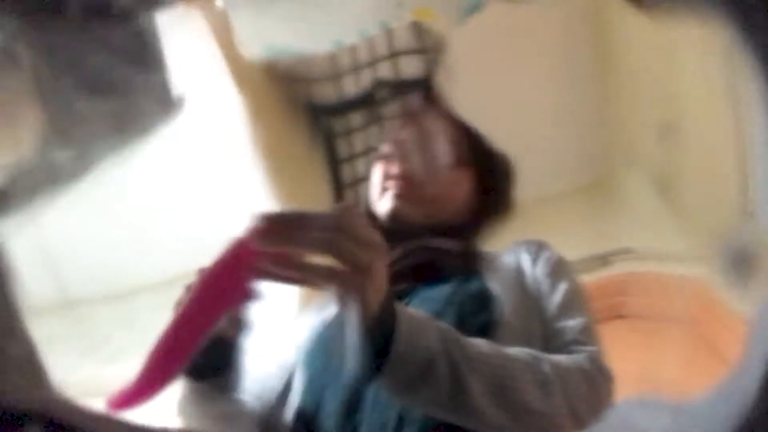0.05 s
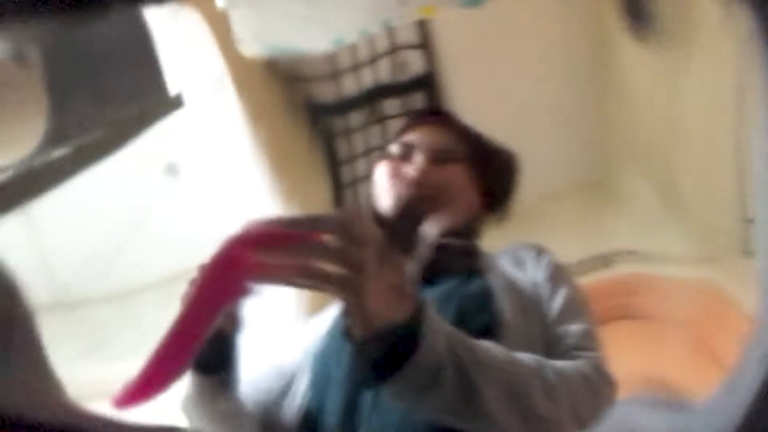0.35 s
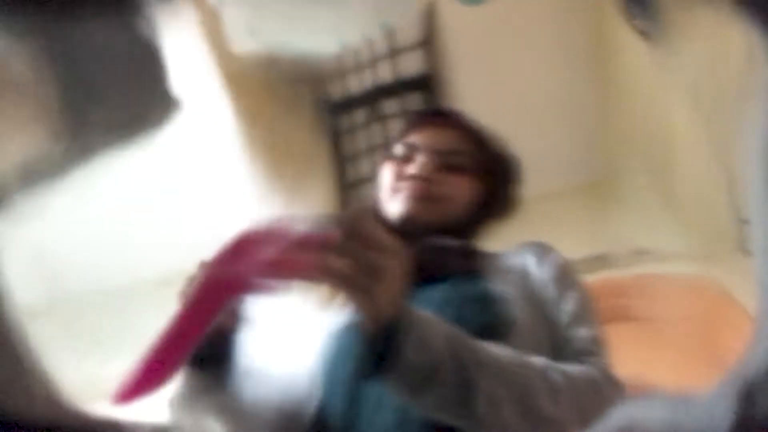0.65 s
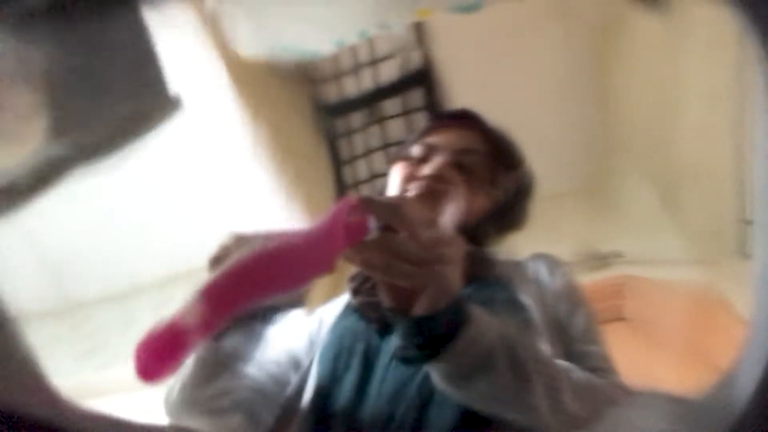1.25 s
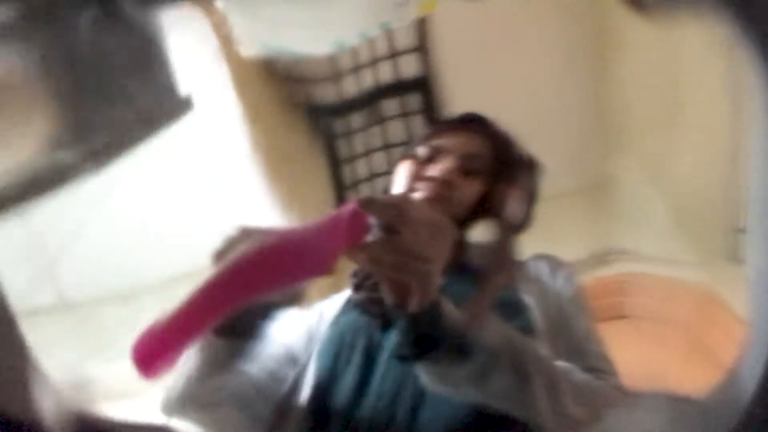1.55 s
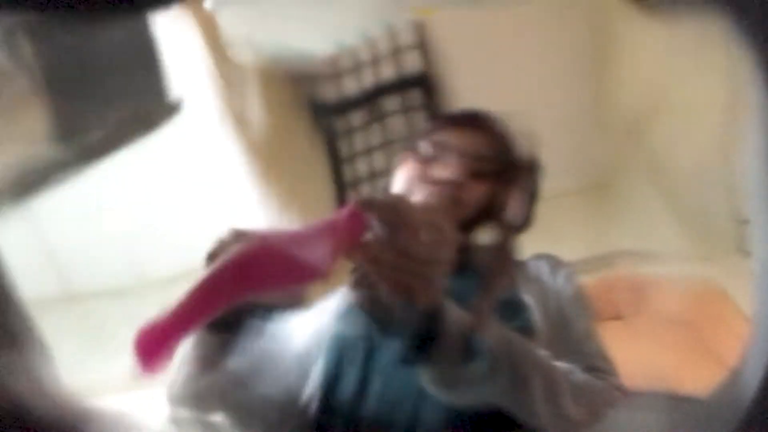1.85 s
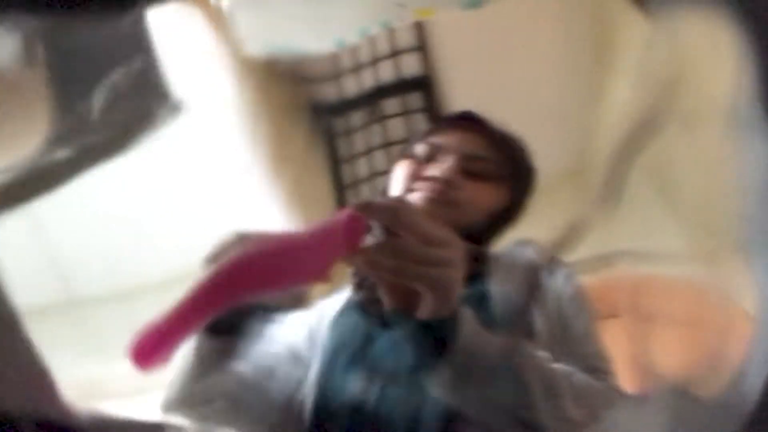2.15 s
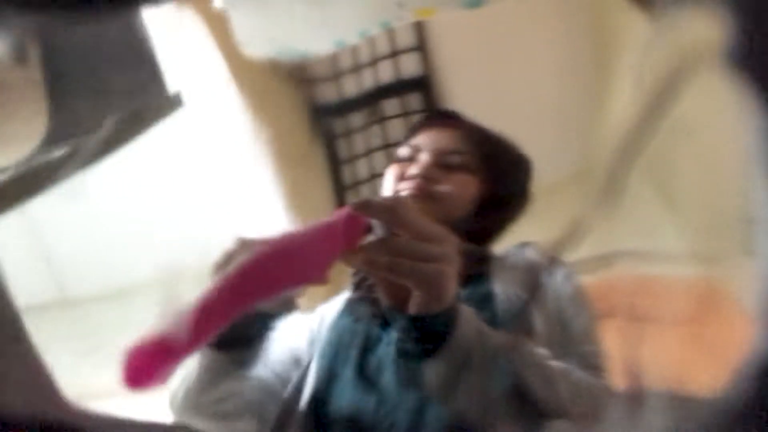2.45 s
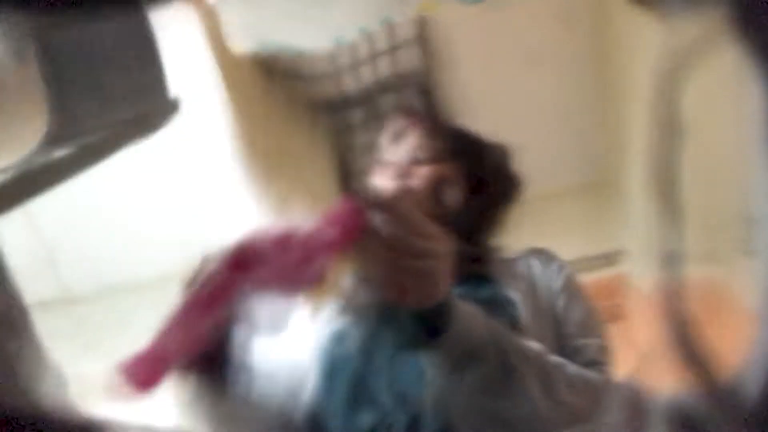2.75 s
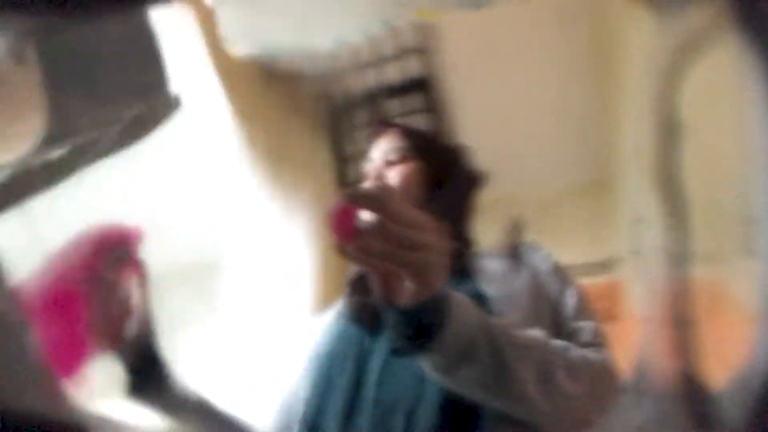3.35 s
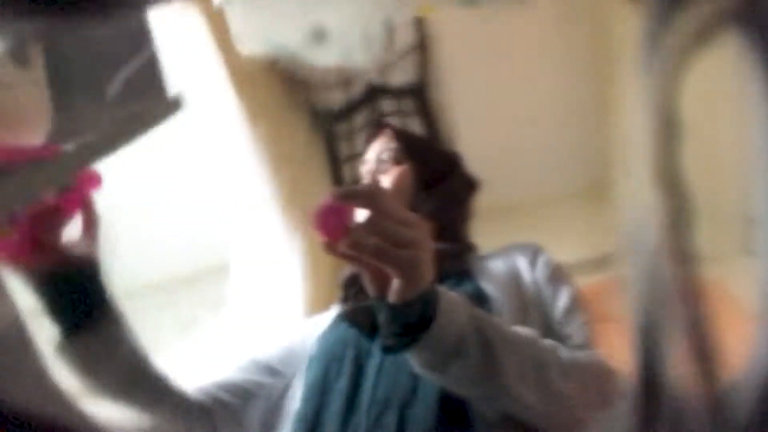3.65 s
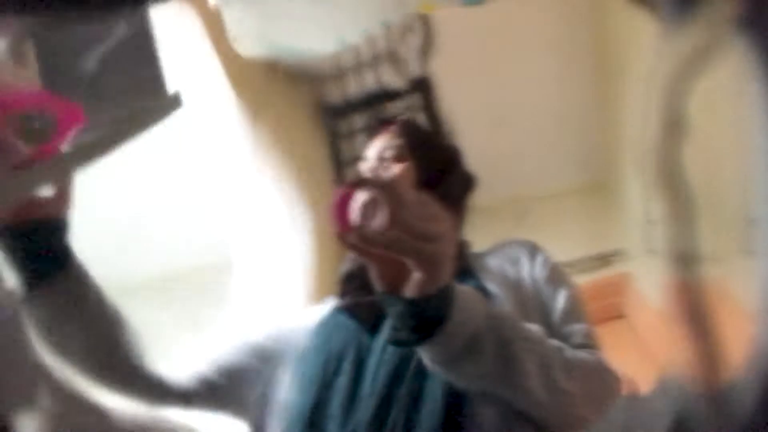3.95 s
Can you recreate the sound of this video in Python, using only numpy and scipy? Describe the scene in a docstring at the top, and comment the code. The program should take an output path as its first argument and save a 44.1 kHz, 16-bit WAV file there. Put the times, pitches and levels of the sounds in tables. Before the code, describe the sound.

Running water drums hollowly on the wall of a washing machine drum, heard from inside, with drops hitting the microphone. Underneath are a low churning rumble, a few dull gulps of air and a faint hum.

```python
"""Water pours into a washing machine drum and spatters on and around a microphone lying inside it.
A surging stream of drops and tiny bubbles, with single louder splashes, rings the microphone's wet
housing, while the jet drumming on the wall keeps its low notes ringing. Below it the tub rumbles under
the churning water, the machine hums faintly, and heavy gulps of air knock on the tub."""
import sys
import numpy as np
from scipy import signal
from scipy.fft import rfft, irfft
from scipy.io import wavfile
from scipy.ndimage import uniform_filter1d

SR = 44100
rng = np.random.default_rng(int(sys.argv[2]) if len(sys.argv) > 2 else 0)


def generate_wav(sig):
    """Save sig (samples, or channels by samples) to the path in sys.argv[1] as 16-bit PCM at SR."""
    pcm = np.round(np.clip(np.atleast_2d(sig).T, -1, 1) * 32767).astype(np.int16)
    wavfile.write(sys.argv[1], SR, pcm)


N = 176400  # 4 seconds

# How strongly the stream runs. Each row: time in seconds, strength in dB.
STREAM_STRENGTH = [(0, 5.5), (.1, 0), (.17, 7), (.33, 1.5), (.45, 0), (.57, 1), (.63, -12), (.67, 2.5),
                   (.74, 2), (.81, -8), (.94, -10.5), (.98, -4), (1.15, -5.5), (1.28, -2), (1.34, 5),
                   (1.48, 1.5), (1.65, 3.5), (2.08, 0), (2.14, 5), (2.27, 6), (2.355, -6.5), (2.45, 2),
                   (2.62, -6), (2.74, 3), (3.02, -1), (3.18, -8.5), (3.28, 0.5), (3.48, -3), (3.6, -4),
                   (4, -4)]
# The tone of a drop's hit before the housing colours it. Each row: frequency in Hz, level in dB.
DROP_TONE = [(500, -5), (1200, -7.5), (2500, -1), (5000, -6), (15000, -3.5)]
# The overall tone of the microphone's housing. Each row: frequency in Hz, level in dB.
HOUSING_TONE = [(100, 21.5), (400, 5.5), (700, 6.5), (1050, 7.5), (1500, 1.5), (2000, -3), (2500, -2),
                (3000, -17), (3800, -6.5), (4500, 1), (5250, -6), (6200, 2), (8300, -8.5), (9200, -2.5),
                (10800, -9), (12500, -12.5), (15500, -1.5)]
# The notes at which the housing rings. Each row: frequency in Hz, boost in dB.
HOUSING_NOTES = [(1184, 16), (1255, 11.5), (1744, 17), (2314, 18), (2637, 16.5), (3057, 19), (3402, 19.5),
                 (3552, 11), (3671, 10), (4252, 12.5), (5049, 13), (5555, 15.5), (6115, 8), (7041, 11),
                 (7439, 12), (8720, 13), (11670, 13), (12403, 18), (13490, 18), (15363, 1)]
# The tone of the jet before the housing colours it. Each row: frequency in Hz, level in dB.
JET_TONE = [(400, -2), (1200, 0), (2300, -1), (4000, -24)]
# How hard the jet drums on the wall. Each row: time in seconds, strength in dB.
JET_STRENGTH = [(0, 5), (.45, 0), (.72, 2.5), (.82, -5), (1.02, -1.5), (2.32, 2.5), (2.37, -1.5), (3, -1.5),
                (3.17, -11.5), (3.32, 1), (3.42, -6), (4, -5.5)]
# The tone of the tub's rumble. Each row: frequency in Hz, level in dB.
TUB_TONE = [(15, -37), (30, -25), (41, -9), (52, 0), (64, -5.5), (85, -1.5), (105, -6.5), (130, -7),
            (160, -16.5), (195, -26), (240, -19), (280, -13), (330, -28), (420, -29), (500, -49),
            (1000, -73.5)]
# How strongly the tub rumbles. Each row: time in seconds, strength in dB.
RUMBLE_STRENGTH = [(0, 1.5), (.75, 0), (1.15, -1), (1.4, 2), (1.9, -0.5), (2.8, -1.5), (3, 0.5), (3.2, -2),
                   (3.5, 0.5), (3.8, -2.5), (4, 4)]
# Splashes close by. Each row: start in seconds, peak level in dB, bubble pitch in Hz,
# level of the spray compared with the bubble in dB.
CLOSE_SPLASHES = [(0.0218, -20.5, 6800, 4.5), (0.2316, -24.5, 4370, -5), (0.2971, -22, 3520, -11.5),
                  (0.39, -25.5, 2680, -1), (0.5239, -19, 2690, 4), (0.6438, -21.5, 2320, 25.5),
                  (.6784, -22.5, 5400, 3.5), (0.715, -19, 4170, -2), (0.758, -26.5, 4400, -3),
                  (.952, -20.5, 3630, 3.5), (1.0865, -26, 5900, 9), (1.1751, -26, 2430, 18),
                  (1.3209, -15.5, 3840, -1.5), (1.4152, -22.5, 5200, 7), (1.5699, -21, 3470, -1.5),
                  (1.9798, -20, 4120, 2), (2.045, -25, 5800, -4), (2.257, -23.5, 6370, -7),
                  (2.371, -25.5, 4140, -24), (2.5556, -26.5, 6060, -3), (3.013, -19, 6120, 14),
                  (3.2154, -24, 2700, -24), (3.2954, -27, 6450, -14), (3.3867, -22, 2780, -26),
                  (3.56, -22.5, 4270, 3), (3.63, -27, 3480, 5)]
# Gulps that knock on the tub. Each row: start in seconds, peak level in dB, pitch in Hz.
AIR_GULPS = [(.754, -19, 235), (.812, -20, 240), (.876, -20, 240), (1.438, -19, 240), (1.584, -17, 62),
             (1.994, -23, 260), (2.262, -15, 75), (2.297, -16, 52), (2.329, -23, 240), (3.68, -21, 240),
             (3.865, -24, 260)]

HISS_LOW_HZ = 2830  # hiss and spray fade away below this


def undb(db):
    """Turn decibels into a number to multiply a sound by."""
    return 10 ** (np.asarray(db) / 20)


def level(x, db):
    """Scale a sound to an average (rms) level in dB."""
    return x * undb(db) / np.sqrt(np.mean(x ** 2))


def curve(points):
    """Join (seconds, value) points with straight lines."""
    return np.interp(np.arange(N) / SR, *np.array(points).T)


def wander(turns_per_s):
    """A value that drifts smoothly at random, mostly between -1 and 1."""
    step = max(int(SR / turns_per_s), 2)
    stairs = np.repeat(rng.standard_normal(N // step + 1), step)
    return 0.67 * uniform_filter1d(stairs, step)[:N]


def tap_sound(tone, notes=(), size=8192):
    """How an object with this tone and these ringing notes answers one sharp tap."""
    hz = np.arange(size // 2 + 1) * SR / size
    tone_hz, tone_db = np.array(tone).T
    db = np.interp(np.log(hz + 1), np.log(tone_hz), tone_db)
    for note_hz, boost_db in notes:
        half_width_hz = 35.8 + 0.0031 * note_hz
        db = db + boost_db / (1 + ((hz - note_hz) / half_width_hz) ** 2)
    # keep the tone, but make all the ringing come after the tap
    cepstrum = irfft(np.log(undb(db)))
    cepstrum[1:size // 2] *= 2
    cepstrum[size // 2 + 1:] = 0
    return irfft(np.exp(rfft(cepstrum)))


def ring(x, body):
    """Let a sound ring an object, given that object's tap sound."""
    return signal.fftconvolve(x, body)[:len(x)]


def add(out, start_s, x):
    """Mix in a short sound at its start time."""
    i = int(np.clip(start_s * SR, 0, N - 1))
    out[i:i + len(x)] += x[:N - i]


def impacts(per_s, spread_db):
    """Sharp taps of uneven size at random times."""
    chance, size = rng.random(N), np.clip(rng.standard_normal(N), -2, 2)
    return (chance < per_s / SR) * undb(spread_db * size) * rng.choice([-1, 1], N)


def drops(flow_db, sputter_db, per_s=330, decay_s=0.0028):
    """Each drop lands as a tiny burst of noise; a stronger stream throws more and bigger drops."""
    hits = impacts(per_s * undb(flow_db), spread_db=5) * undb(0.34 * flow_db + sputter_db)
    fading_energy = signal.lfilter([1], [1, -np.exp(-2 / (decay_s * SR))], hits ** 2)
    return ring(np.sqrt(fading_energy) * rng.standard_normal(N), tap_sound(DROP_TONE))


def pop(hz, decay_s, size, width_hz=1380):
    """A bubble bursts with a sudden, dry tick that has only a rough pitch."""
    t = np.arange(size) / SR
    kick = rng.standard_normal(size) * np.exp(-t / decay_s)
    pole = np.exp((2j * hz - width_hz) * np.pi / SR)  # tunes the filter to the bubble's pitch
    tick = signal.lfilter([1], np.poly([pole, pole]), kick).real
    return tick / np.linalg.norm(tick)


def fizz(strength, per_s=450, low_hz=3210, high_hz=15580):
    """Tiny bubbles pop at random times and pitches, louder when the stream is strong."""
    out = np.zeros(N)
    for when, pitch, luck in rng.random((int(per_s * N / SR), 3)):
        hz = low_hz * (high_hz / low_hz) ** pitch
        extra_db = 3.5 * min(-np.log(luck), 3)  # a few pops stand out
        gain = strength[int(when * N)] * undb(extra_db)
        add(out, when * N / SR, gain * pop(hz, decay_s=0.0026, size=600))
    return out


def stream(housing):
    """Drops and tiny bubbles ring the housing in sputtering bursts over a fine hiss."""
    flow_db = curve(STREAM_STRENGTH)
    sputter_db = 5 * np.clip(wander(48), -2, 1.5)
    treble = signal.butter(2, HISS_LOW_HZ, "high", fs=SR, output="sos")
    hiss = ring(signal.sosfilt(treble, rng.standard_normal(N)) * undb(flow_db), housing)
    spatter = ring(drops(flow_db, sputter_db), housing)
    bubbles = ring(fizz(undb(flow_db + sputter_db)), housing)
    return level(hiss, db=-51) + level(spatter, db=-41) + level(bubbles, db=-42)


def jet(housing):
    """The unbroken jet drums on the wall and keeps the housing's low notes ringing: a hollow sound."""
    drumming = ring(rng.standard_normal(N), tap_sound(JET_TONE)) * undb(curve(JET_STRENGTH))
    return level(ring(drumming, housing), db=-43)


def tub(hum_hz=52.9, waver_db=11):
    """Churning water thuds on the tub over a faint, wavering machine hum."""
    thuds = impacts(per_s=350, spread_db=2.3) * undb(curve(RUMBLE_STRENGTH))
    rumble = ring(thuds, tap_sound(TUB_TONE))
    hum = np.sin(2 * np.pi * hum_hz * np.arange(N) / SR) * undb(waver_db * wander(5.1))
    return level(rumble, db=-24.5) + level(hum, db=-38)


def splashes(housing, rise_s=0.001, decay_s=0.0059, size=4096):
    """Each splash throws a burst of spray and pops a larger bubble; both ring the housing."""
    out, t = np.zeros(N), np.arange(size) / SR
    burst = np.minimum(t / rise_s, 1) * np.exp(-t / decay_s)
    treble = signal.butter(1, HISS_LOW_HZ, "high", fs=SR, output="sos")
    for start, peak_db, hz, spray_db in CLOSE_SPLASHES:
        spray = signal.sosfilt(treble, rng.standard_normal(size)) * burst
        bubble = pop(hz, decay_s=0.0057, size=size)
        splash = ring(level(spray, spray_db) + level(bubble, 0), housing)
        add(out, start, splash / np.abs(splash).max() * undb(peak_db))
    return out


def gulps(cycles_to_peak=0.85, size=4096):
    """Pockets of air knock on the tub for two or three cycles, the bigger the lower."""
    out, t = np.zeros(N), np.arange(size) / SR
    for start, peak_db, hz in AIR_GULPS:
        age = t * hz / cycles_to_peak
        rise_and_fall = age * np.exp(1 - age)
        add(out, start, np.sin(2 * np.pi * hz * t) * rise_and_fall * undb(peak_db))
    return out


def scene():
    """Add all the sounds together in one channel."""
    housing = tap_sound(HOUSING_TONE, HOUSING_NOTES)
    return (tub() + gulps() + jet(housing) + splashes(housing) + stream(housing))[None]


def record(dry, top_hz=15750):
    """Cut off the very highest treble."""
    return signal.sosfilt(signal.ellip(10, .2, 80, top_hz, fs=SR, output="sos"), dry)


dry = scene()
out = record(dry)
generate_wav(out)
```